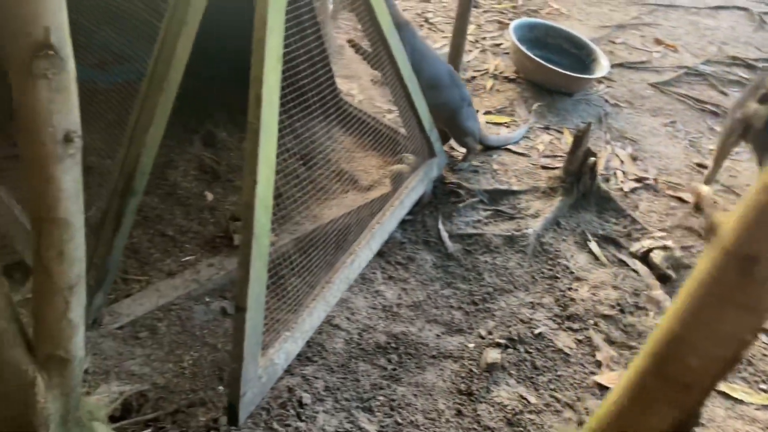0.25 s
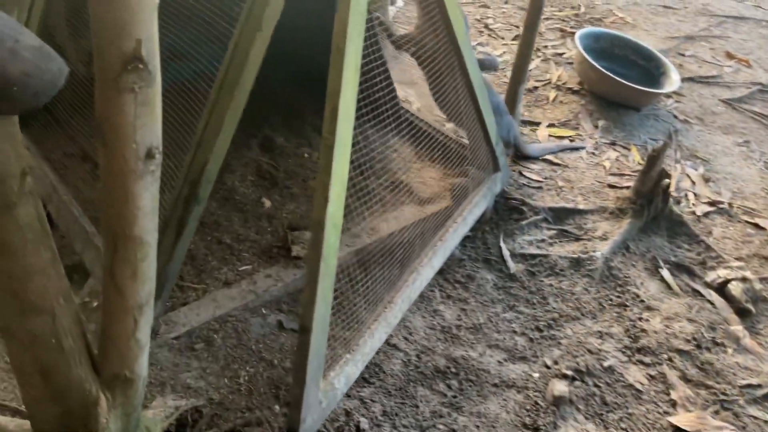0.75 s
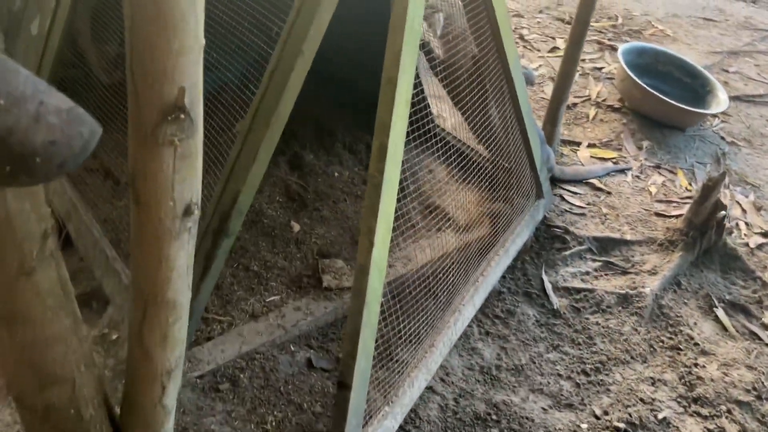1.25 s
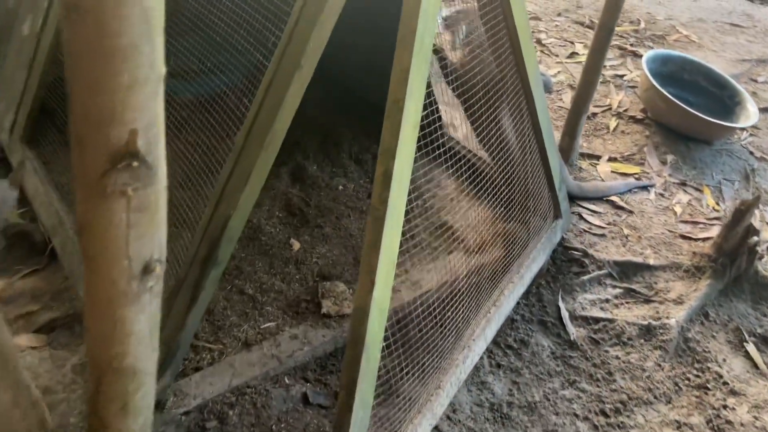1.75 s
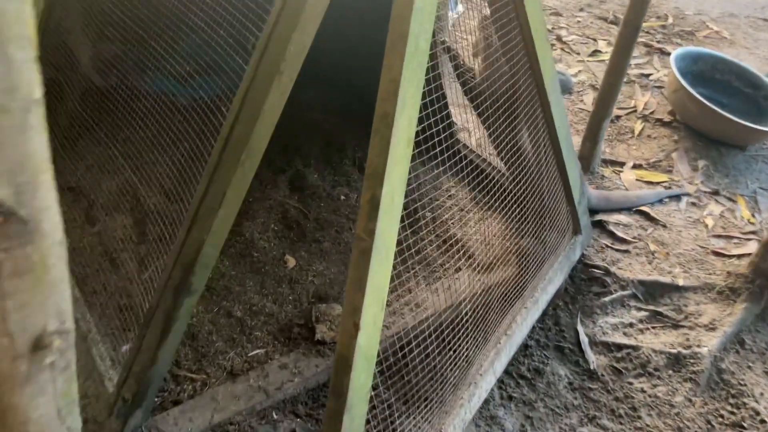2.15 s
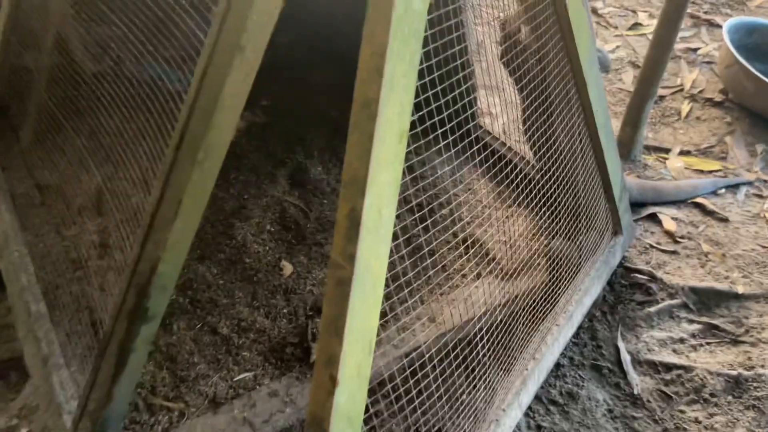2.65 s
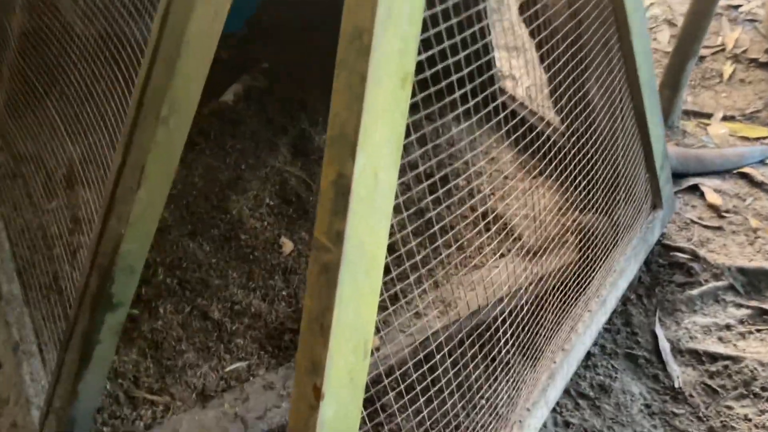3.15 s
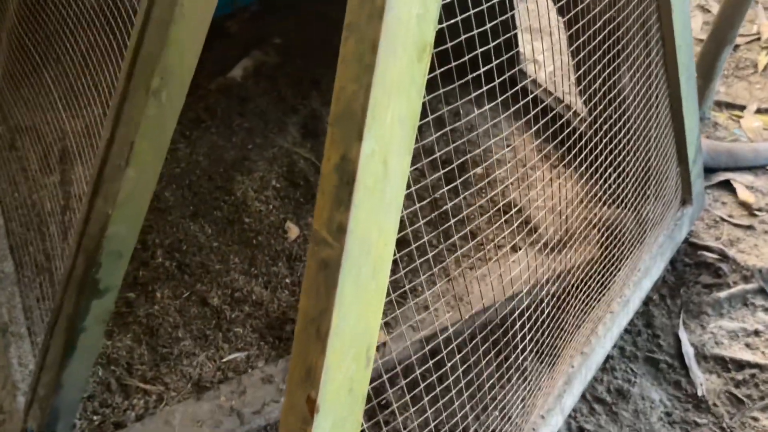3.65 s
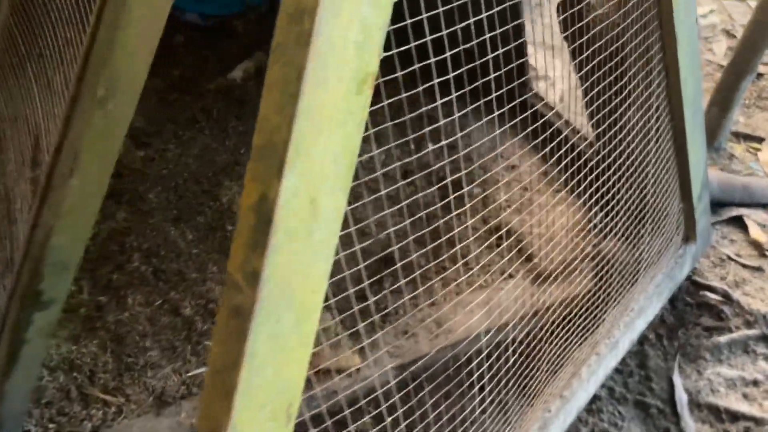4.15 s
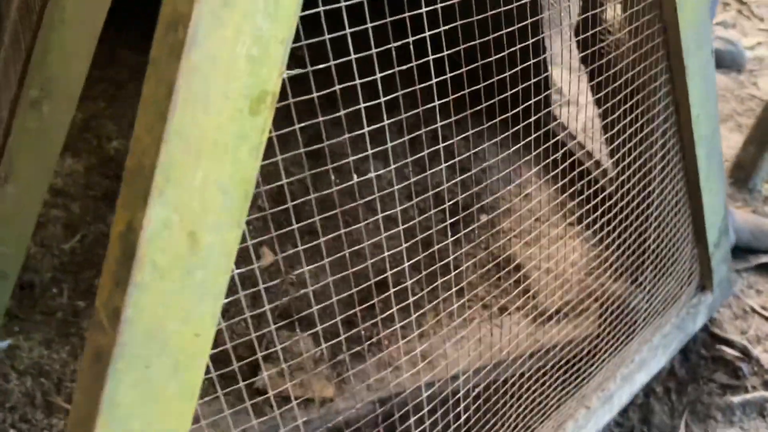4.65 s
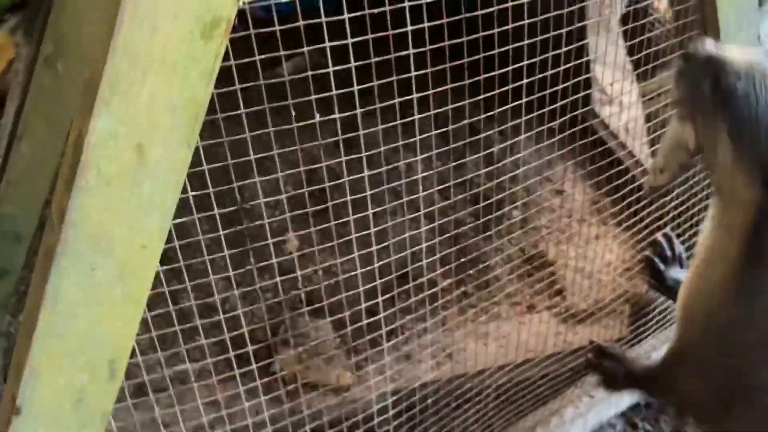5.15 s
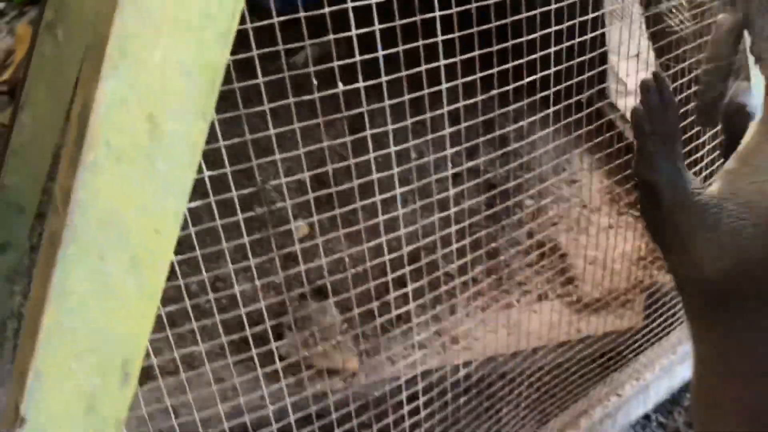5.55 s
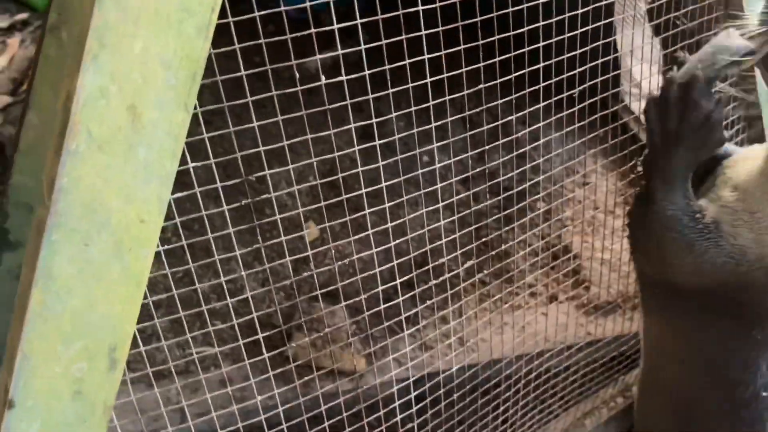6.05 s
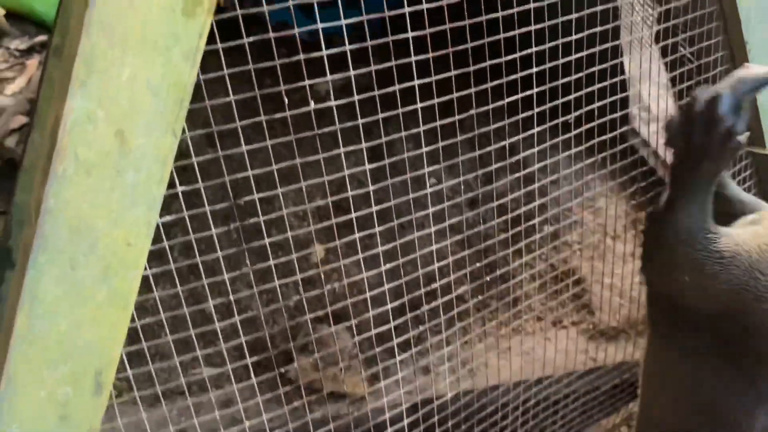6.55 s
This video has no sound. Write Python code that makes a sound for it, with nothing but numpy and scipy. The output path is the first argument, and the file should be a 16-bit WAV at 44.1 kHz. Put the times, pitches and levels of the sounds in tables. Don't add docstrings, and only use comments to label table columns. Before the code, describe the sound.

An otter close by gives hoarse, wavering screams broken by short high chirps, with claws ticking on wire mesh and faint yard hiss.

```python
import sys
import numpy as np
from scipy import signal
from scipy.fft import rfft, irfft, next_fast_len
from scipy.io import wavfile
from scipy.ndimage import uniform_filter1d, map_coordinates

SR = 44100
rng = np.random.default_rng(int(sys.argv[2]) if len(sys.argv) > 2 else 0)


def put_to_file(sound):
    columns = np.atleast_2d(sound).T
    safe = np.clip(columns, -1, 1)
    whole_steps = np.round(safe * 32767)
    wavfile.write(sys.argv[1], SR, whole_steps.astype(np.int16))


def nominal_scale(level):
    x = np.asarray(level, float) / 20
    return 10 ** x


N = 299880


def rms_one(x):
    return x / np.sqrt(np.mean(x ** 2) + 1e-20)


def at_hz(points, hz):
    point_hz, value = np.array(points).T
    return np.interp(np.log(hz + 1), np.log(point_hz), value)


def colour(x, points):
    length = x.shape[-1]
    size = next_fast_len(length + 2048)
    hz = np.arange(size // 2 + 1) * SR / size
    return irfft(rfft(x, size) * nominal_scale(at_hz(points, hz)), size)[..., :length]


def drift(rate_hz, size):
    r = np.exp(-2 * np.pi * rate_hz / SR)
    noise = rng.standard_normal(size + 8000)
    return rms_one(signal.lfilter([1], [1, -2 * r, r * r], noise)[8000:])


def unroll(rows):
    s, *columns = np.transpose(rows)
    at = np.arange(round(s[0] * SR), min(round(s[-1] * SR), N))
    fade = np.clip(np.minimum(at - at[0], at[-1] - at) / (0.0032 * SR), 0, 1)
    return at, fade, [np.interp(at / SR, s, c) for c in columns]


def evened(x):
    return x / np.sqrt(uniform_filter1d(x ** 2, size=600) + 1e-12)


def background():
    # t/s, level/dB
    rumble_level = [
        (0, -48),
        (2.6, -50),
        (2.69, -42),
        (2.78, -50),
        (5.1, -49.5),
        (5.3, -42),
        (5.8, -44.5),
        (6, -49.5),
        (6.3, -45),
        (6.6, -52),
    ]
    # f/Hz, level/dB per Hz
    rumble_colour = [(20, -28), (35, -8), (60, 3.5), (110, 0.5), (200, -9.5), (350, -20), (700, -25),
                     (2000, -54)]
    # t/s, level/dB
    yard_level = [(0, -45), (.25, -41.5), (1.1, -45.5), (3.5, -49), (5.3, -45), (6.8, -46)]
    # f/Hz, level/dB per Hz
    yard_colour = [(200, 1.5), (500, 3.5), (1000, 5), (1900, 4.5), (3000, -3), (4800, 6.5), (6400, 7.5),
                   (8500, -7.5), (10500, 5), (12200, -9)]
    now = np.arange(N) / SR
    shared, own = rng.standard_normal(N), rng.standard_normal((2, N))
    rumble = rms_one(colour(shared + 0.19 * own, rumble_colour))
    rumble = rumble * nominal_scale(np.interp(now, *np.transpose(rumble_level)) + 5.0)
    hiss = rms_one(colour(rng.standard_normal((2, N)), yard_colour))
    hiss = hiss * nominal_scale(np.interp(now, *np.transpose(yard_level)) + 1.5 * drift(8, N))
    return rumble + hiss


def pen(x, t60):
    t = np.arange(SR // 2) / SR
    tail = rng.standard_normal((2, len(t))) * nominal_scale(-60 * t / t60) * np.clip(t / 0.0028, 0, 1)
    tail = colour(tail, [(500, -12), (2200, -8), (3200, -12), (5000, 0), (12000, 0)])
    tail = tail / np.sqrt(np.sum(tail ** 2) / 2)
    return signal.fftconvolve(x[None], tail, axes=1)[:, :N]


def claws():
    # t/s, peak level/dB, centre f/Hz, time to die by 60 dB/s
    ticks = [
        (2.255, -37.5, 400, 0.052),
        (2.685, -31.5, 350, 0.065),
        (3.235, -49, 3010, 0.019),
        (3.599, -38, 9200, 0.35),
        (3.623, -37, 9200, 0.17),
        (4.035, -18.5, 2140, 0.019),
        (4.148, -27, 2520, 0.041),
        (5.339, -36, 3500, 0.053),
        (6.659, -32, 1370, 0.088),
        (6.659, -47, 8900, .06),
    ]
    size = 8192
    out, t = np.zeros(N + size), np.arange(size) / SR
    for s, peak_db, hz, t60 in ticks:
        grit = rng.standard_normal(size) * nominal_scale(3.0 * drift(300, size) - 60 * t / t60)
        grit[0] += 3.0
        band = signal.butter(1, [hz / 2.8, min(hz * 1.98, 16000)], "band", fs=SR)
        start = round(s * SR)
        out[start:start + size] += nominal_scale(peak_db) * np.sqrt(3000 / hz) * signal.lfilter(*band, grit)
    return out[:N]


def far_otter():
    # t/s, pitch f/Hz, level of the lowest tone/dB
    whine_a = [(1.84, 816, -74), (2.1, 860, -76), (2.37, 874.5, -70.5), (2.5, 852, -90), (3.1, 836, -91)]
    whine_b = [(5.3, 726, -80.5), (5.752, 779, -77.5), (5.799, 850, -57)]
    whine_c = [(6.451, 1543, -72), (6.64, 1425, -107), (6.7, 1470, -58)]
    overtones = [-6, -16]
    out = np.zeros(N)
    for rows in (whine_a, whine_b, whine_c):
        at, fade, (pitch, level_db) = unroll(rows)
        cycle = 2 * np.pi * np.cumsum(pitch * (1 + 0.0109 * drift(32, len(at)))) / SR
        tone = np.sin(cycle)
        for multiple, db in enumerate(overtones, start=2):
            tone = tone + nominal_scale(db) * np.sin(multiple * cycle)
        out[at] += fade * nominal_scale(level_db + 16.0 + 5.9 * drift(29, len(at))) * tone
    return out


def call(pitch, level_db, bright_db, rough, breath, hoarse_db):
    # f/Hz, level/dB
    throat = [(300, -12), (750, -6), (1100, -4.5), (1650, -3.5), (1950, 13), (2250, 16), (2750, -9),
              (3300, -9), (4200, -13.5), (5300, -2.5), (6500, -11.5), (8000, -16.5), (9400, -16),
              (10500, -8), (12200, -22.5)]
    mouth_split_hz, rasp_split_hz = 4000, 7200
    size = len(pitch)
    rough = np.clip(rough + .2 * np.clip(1 - pitch / 900, 0, 1), 0, 1)
    rasp_db = -2.5 - 15.9 * np.log2(pitch / 800)

    beat = np.sin(2 * np.pi * np.cumsum(30 * (1 + .35 * drift(20, size))) / SR)
    flutter = .012 * beat + .005 * drift(25, size) + .07 * rough ** 2 * drift(110, size)
    pitch = pitch * (1 + flutter + (.003 + .01 * rough) * drift(400, size))
    cycle = 2 * np.pi * np.cumsum(pitch) / SR

    broken_db = .7 + rough
    pulses = np.zeros(size)
    for k in range(1, 30):
        partial = np.cos(k * cycle + .2 * k * k) * (k * pitch < 14000)
        pulses += partial * nominal_scale(broken_db * min(k, 5) * drift(27, size))
    pulses = pulses * np.sqrt(pitch / 7000) * nominal_scale((1.5 + hoarse_db * rough) * drift(146, size))

    air = rng.standard_normal(size) * (1 + 0.17 * np.cos(cycle))
    voiced = colour(pulses + .7 * rough ** 2 * air, throat)
    airy = colour(pulses + (breath + 0.87 * rough) * air, throat)
    raspy = colour(pulses + (0.84 + 0.5 * rough) * air, throat)
    low_band = signal.butter(4, mouth_split_hz, fs=SR, output="sos")
    middle_band = signal.butter(3, [mouth_split_hz, rasp_split_hz], "band", fs=SR, output="sos")
    top_band = signal.butter(4, rasp_split_hz, "high", fs=SR, output="sos")
    low = evened(signal.sosfilt(low_band, voiced))
    middle = evened(signal.sosfilt(middle_band, airy))
    top = evened(signal.sosfilt(top_band, raspy))

    high = middle + nominal_scale(rasp_db + 0.55 * drift(25, size)) * top
    high = high / np.sqrt(1 + nominal_scale(2 * rasp_db))
    return nominal_scale(level_db) * (low + nominal_scale(bright_db) * high) / np.sqrt(1 + nominal_scale(2 * bright_db))


def crests(start, end, then):
    # crest t/s, crest f/Hz, level/dB, brightness/dB, rises from f/Hz
    chirps = [(1.182, 2027, -9.5, -11.5, 1566), (1.25, 1395, -34, 5, 1400), (1.397, 1546, -33.5, 0, 1466),
              (1.488, 1185, -31, 5.5, 1095), (1.658, 1393, -28.5, 6, 1282), (1.722, 1166, -20, -14, 920),
              (1.788, 1205, -28.5, -6.5, 1046), (1.846, 1222, -32.5, 1, 1026), (1.991, 1818, -28, 6, 1460),
              (2.056, 1336, -25, 12, 1200), (2.117, 1224, -25.5, -6, 1152), (3.49, 1722, -27.5, 5, 1356),
              (3.525, 1250, -31.5, 2, 1356), (4.839, 1548, -29, 10, 1239), (4.901, 1244, -24, 2, 1164),
              (4.957, 1164, -26, -4, 990), (5.129, 1508, -23, 10.5, 1352), (5.2, 1057, -27.5, -8, 1056),
              (5.256, 1046, -26, -17, 957), (5.288, 1160, -25, -24, 1072), (6.737, 1357, -32.5, 3, 1353),
              (6.795, 1006, -23, -17, 908)]
    openings = [
        (0.031, 518, -45, -3, 530),
        (0.082, 475, -39.5, 2, 484),
        (2.3, 1238, -26, -6, 1257),
        (2.342, 1111, -26, -1, 969),
        (2.39, 1247, -29.5, 2.5, 933),
        (3.701, 1870, -23.5, 21, 1397),
        (3.772, 1329, -34.5, 13, 1215),
        (4.302, 1299, -33.5, 6.5, 1313),
        (5.507, 1557, -30, 5, 1450),
    ]
    onset_db, dip_db, dip_bright_db = -35, -5, -3.2
    roundness, shoulder = .56, 0.24
    clear_s, chirp_rough, grunt_hz, grunt_rough = 0.024, 0.128, 700, 0.53
    rows, last = [], None
    for s, hz, db, bright_db, from_hz in sorted(chirps + openings):
        if not start < s < end:
            continue
        rough = np.interp(s, [start + clear_s, then[0]], [chirp_rough, then[-1]])
        if hz < grunt_hz:
            rough = grunt_rough
        crest = (s, hz, db, bright_db)
        if last is None:
            low_s, low_db = start, min(onset_db, db)
            slopes = [crest]
        else:
            low_s, low_db = (last[0] + s) / 2, min(last[2], db) + dip_db
            slopes = [last, crest]
        for top_s, top_hz, top_db, top_bright_db in slopes:
            shoulder_hz = from_hz + roundness * (top_hz - from_hz)
            shoulder_db = low_db + shoulder * (top_db - low_db)
            rows.append(((top_s + low_s) / 2, shoulder_hz, shoulder_db, (top_bright_db + dip_bright_db) / 2, rough))
        rows += [(low_s, from_hz, low_db, dip_bright_db, rough), (*crest, rough)]
        last = crest
    return rows


def near_otter():
    # start t/s, end t/s, last pitch f/Hz, last level/dB, fullness of the low partials/dB
    breaths = [(0.02, 0.046, 480, -38, 0.1), (0.072, 0.12, 477, -54, 2), (.124, 1.057, 783, -29, 0),
               (1.157, 1.208, 1630, -44, -5), (1.226, 1.278, 1245, -41, -3), (1.382, 1.494, 1130, -41, 14),
               (1.632, 1.856, 1270, -50, -2), (1.967, 2.119, 1240, -32, -23), (2.274, 3.35, 834, -35, 10),
               (3.46, 3.535, 1236, -53, -8), (3.672, 4.175, 1084, -34.5, 13),
               (4.285, 4.69, 866, -36.5, -1.5), (4.813, 5.002, 1183, -37.5, -11),
               (5.119, 5.288, 1220, -34, -2.5), (5.487, 6.519, 790, -35, 14),
               (6.718, 6.797, 1030, -35, -13)]
    # t/s, pitch f/Hz, level/dB, brightness/dB, roughness/0-1
    scream_a = [(.124, 494, -37.5, 3, 0.3), (.2, 548.5, -47, -6, 0.69), (.26, 570, -34.5, -8, 0.38),
                (.471, 578.5, -30, -2.5, .35), (.7, 595, -29.5, -0.5, 0.33), (.87, 631, -29.5, 4.5, 0.14),
                (1.0, 636, -28, -1.5, .05), (1.03, 689, -25.5, -5, 0), (1.046, 785, -30.5, -5.5, 0.2)]
    scream_b = [(2.436, 797, -31.5, -3.5, .6), (2.5, 700, -31, 3, 0.56), (2.585, 774, -29.5, 0, .55),
                (2.63, 660.6, -32.5, -0.5, .5), (2.85, 623, -31, 2.5, .5), (3.029, 599.7, -31, 4, 0.257),
                (3.095, 713.6, -31, -0.5, 0.089), (3.231, 778, -30.5, 2.5, 0.033),
                (3.291, 736, -32, 2.5, 0.037)]
    scream_c = [(3.833, 1083, -28.5, -9, 0.0091), (3.903, 1122, -32.5, -2, 0),
                (3.938, 1076, -28.5, -11.5, 0), (4.086, 1041, -33, -8, 0.046)]
    scream_d = [(4.318, 1227, -32.5, 3, .1), (4.34, 845, -33.5, -5.5, .15), (4.362, 908, -33.5, 8, 0.22),
                (4.384, 715, -29, -8.5, 0.42), (4.429, 726, -29, -3, 0.47), (4.528, 610.6, -32, 0.5, .5),
                (4.598, 617.5, -31, -2, 0.69), (4.657, 782, -30.5, 1.5, 0.56)]
    scream_e = [(5.529, 1147, -34, -3.5, 0.17), (5.682, 1113, -31, -7.5, 0.291), (5.791, 852, -36, 8.5, .4),
                (5.93, 680, -35.5, -1, 0.69), (6.031, 664.5, -35, -3.5, 0.11), (6.24, 758, -28.5, -3, 0.12),
                (6.31, 723.6, -33, -2.5, 0.437), (6.399, 758.6, -27.5, -9.5, 0.51),
                (6.494, 788.6, -27.5, -1, 0.14)]
    # t/s, share of pitch lost/0-1
    slips = [(.29, 0.047), (0.372, 0.1), (0.472, 0.068), (.522, 0.081), (0.559, 0.069), (0.626, .09),
             (0.683, 0.087), (.794, 0.13), (.878, 0.098), (.952, 0.057), (2.48, 0.056), (2.52, 0.16),
             (2.6, 0.076), (2.689, .15), (2.737, 0.12), (2.781, .1), (2.82, 0.1), (2.898, 0.16),
             (3.073, 0.063), (4.436, 0.067), (4.461, 0.12), (4.546, 0.066), (4.595, 0.058), (5.93, 0.094),
             (6.272, 0.16), (6.292, 0.16), (6.335, .13), (6.382, 0.16), (6.44, 0.087)]
    slip_s, slip_db_per_share, slip_rough = .012, 5.5, 1.2
    release_s, release_db = 0.0052, -48
    chest_hz, chest_first_db = 1650, -5.5
    chirp_rough = 0.128
    out = np.zeros(N)
    screams = scream_a + scream_b + scream_c + scream_d + scream_e
    for start, end, hz, db, full_db in breaths:
        held = [row for row in screams if start <= row[0] < end]
        then = held[0] if held else (end, chirp_rough)
        rows = sorted(crests(start, end, then) + held)
        ending = rows[-1][3:]
        rows += [(end, hz, db, *ending), (end + release_s, hz, db + release_db, *ending)]
        at, fade, (pitch, level_db, bright_db, rough) = unroll(rows)
        now = at / SR
        slip = sum(share * np.exp(-((now - s) / slip_s) ** 2) for s, share in slips)
        sound = call(pitch * (1 - slip), level_db + slip_db_per_share * slip, bright_db,
                     rough + slip_rough * slip, breath=0.2, hoarse_db=2.0)
        chest = colour(sound, [(chest_hz, 0), (chest_hz * 1.15, -40)])
        chest_db = np.interp(now, [start, end], [chest_first_db, full_db])
        chest_db = chest_db * np.clip(1 - 4.0 * rough, 0, 1)
        out[at] += fade * (sound + (nominal_scale(chest_db) - 1) * chest)
    return nominal_scale(0.74) * out


def scene():
    # t/s, lag/ms
    right_lag = [(0, .24), (6.8, .3)]
    near, far = near_otter() + claws(), far_otter()
    direct = near + far
    lag = np.interp(np.arange(N) / SR, *np.transpose(right_lag)) * SR / 1000
    right = map_coordinates(direct, [np.arange(N) - lag], order=3)
    early = nominal_scale(-3.5) * pen(near, t60=.05)
    late = nominal_scale(-14) * pen(near, t60=.4)
    distant = nominal_scale(17.5) * pen(far, t60=0.66)
    return np.stack([direct, right]) + early + late + distant + background()


def low_pass(x):
    return signal.sosfilt(signal.butter(12, 13560, fs=SR, output="sos"), x)


def record(dry):
    # f/Hz, level/dB
    right_colour = [(60, -1), (300, -2), (750, -6.5), (1300, -3.5), (2300, 2.5), (3000, 1), (4000, -1),
                    (8000, -1)]
    # f/Hz, phase/rad
    port_turn = [(1000, .1), (1400, .8), (1900, .85), (2350, .2), (2900, -2.1), (3800, -1.8), (4700, 0)]
    # f/Hz, phase/rad (3.14 leaves the difference
    top_turn = [(8300, 0), (9200, 1.3), (9950, 3.14), (10300, 3.14), (11000, 4.6), (11700, 6.28),
                (13000, 6.7)]
    shared_hz, cutoff_hz = 8000, 14000
    dry = .3 * np.tanh(dry / .3)
    left, right = rfft(dry[0]), rfft(colour(dry[1], right_colour))
    hz = np.arange(len(left)) * SR / N
    right = right * np.exp(1j * at_hz(port_turn, hz))

    shared = np.clip((hz - shared_hz) / 800 + .5, 0, 1)
    turn = at_hz(top_turn, hz) / 2
    total = left * np.cos(turn)
    difference = 1j * (.6 * left + .7 * right) * np.sin(turn)
    top = np.stack([total - difference, total + difference])
    ports = (1 - shared) * np.stack([left, right]) + shared * top
    steep_cut = signal.cheby2(12, 60, cutoff_hz, fs=SR, output="sos")
    both = signal.sosfilt(steep_cut, irfft(ports, N))

    for edge_hz, share in ((11600, .15), (12200, .45), (12800, .85)):
        lost = np.repeat(drift(7000, N // 1024 + 1) < (2 * share - 1) * 1.3, 1024)[:N]
        above = irfft(rfft(both) * (hz > edge_hz), N)
        both = both - uniform_filter1d(1. * lost, size=200) * above
    return low_pass(both)


dry = scene()
out = record(dry)
put_to_file(out)
```